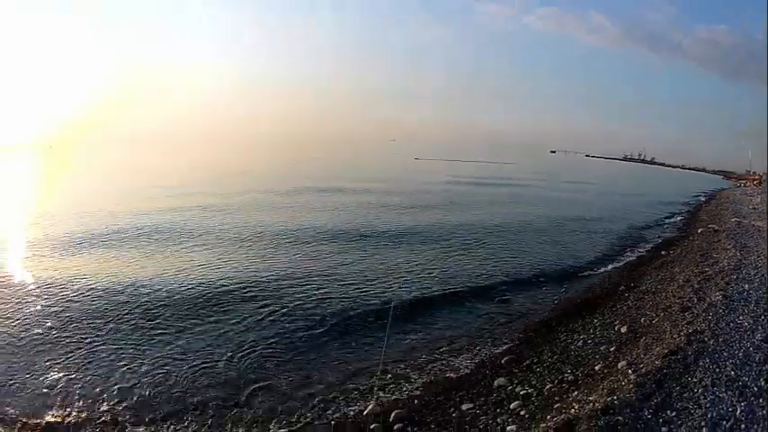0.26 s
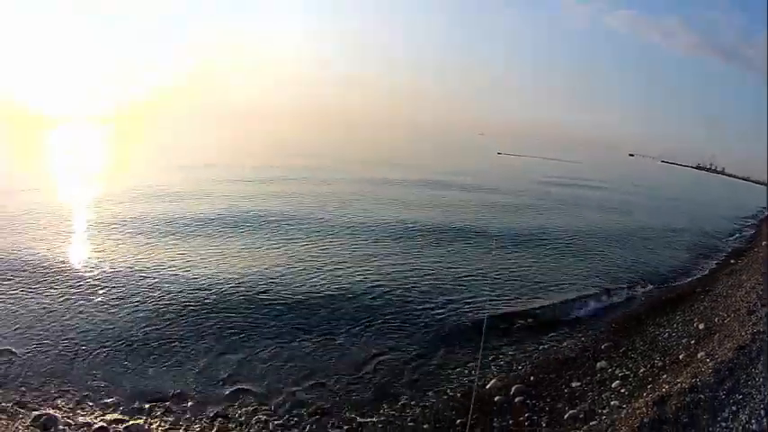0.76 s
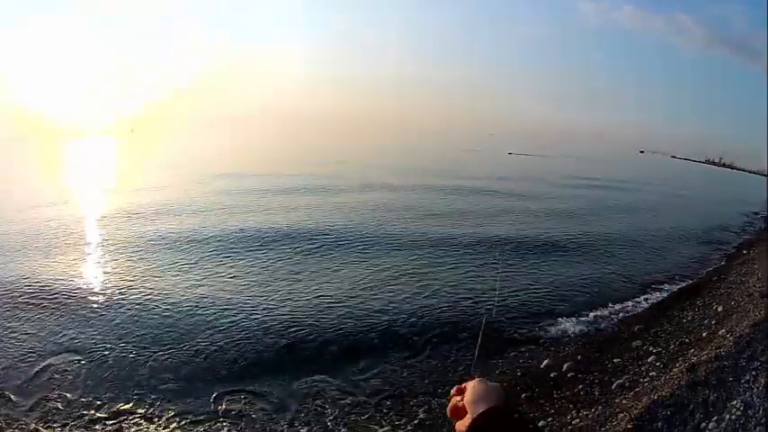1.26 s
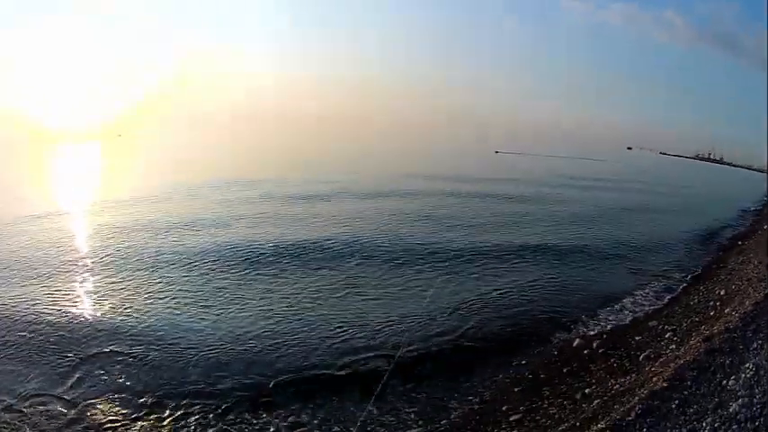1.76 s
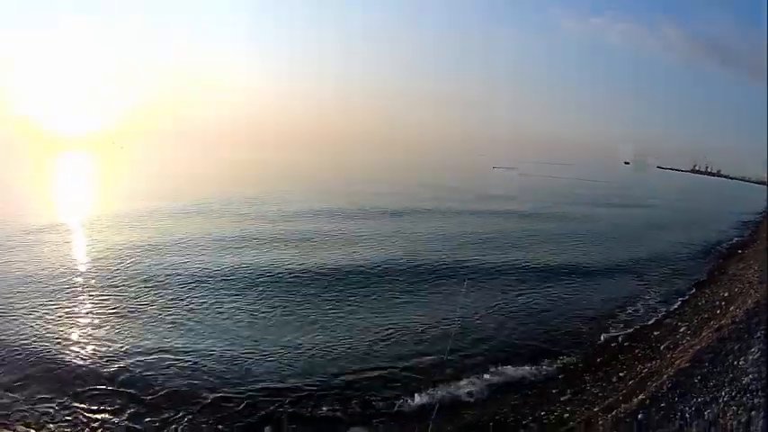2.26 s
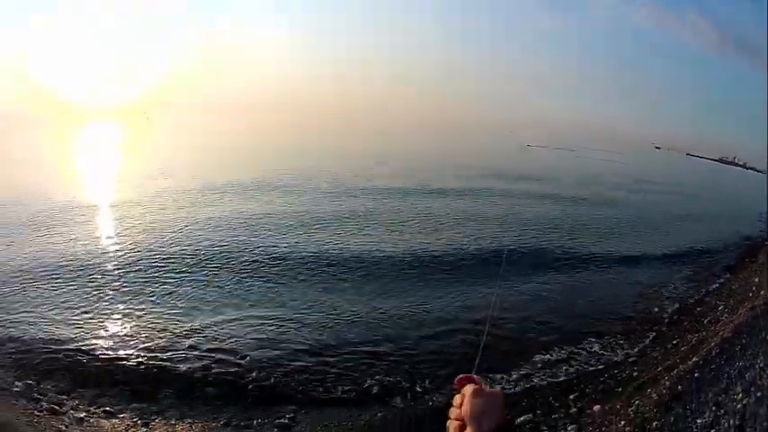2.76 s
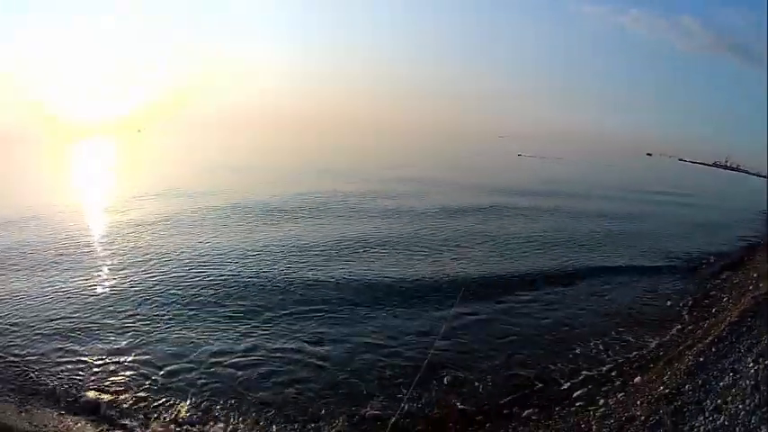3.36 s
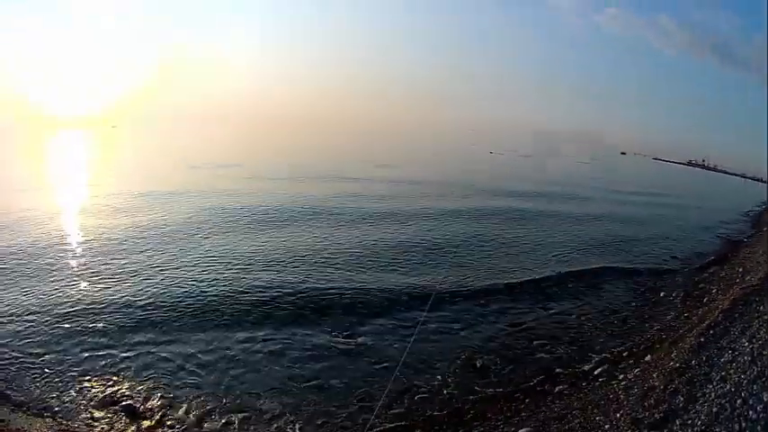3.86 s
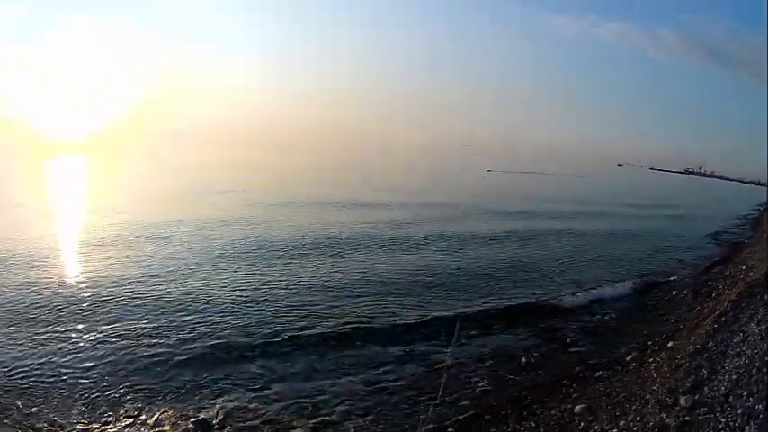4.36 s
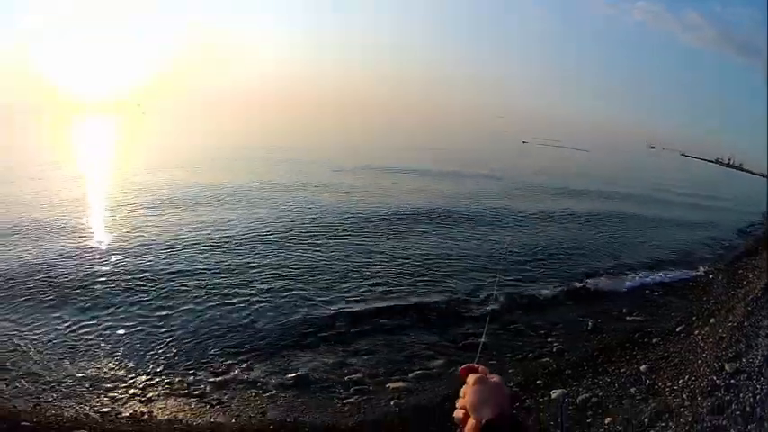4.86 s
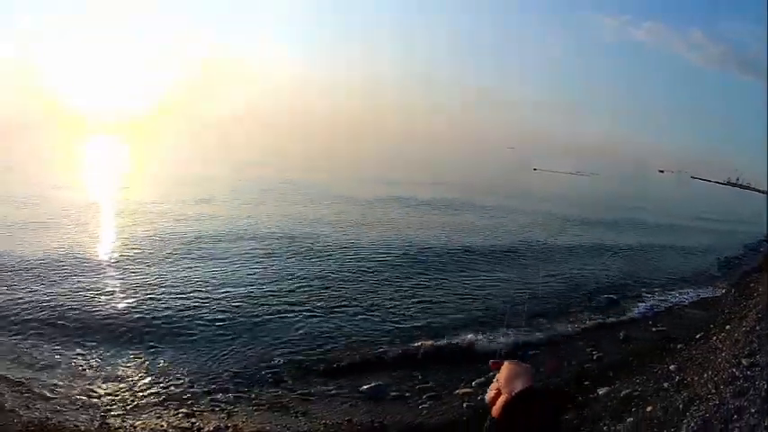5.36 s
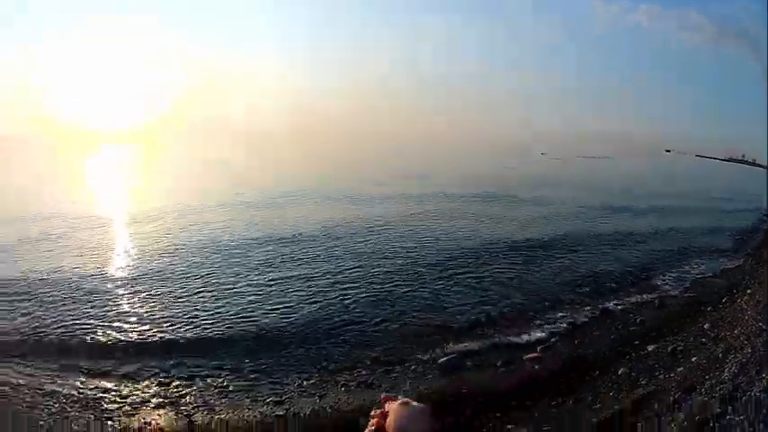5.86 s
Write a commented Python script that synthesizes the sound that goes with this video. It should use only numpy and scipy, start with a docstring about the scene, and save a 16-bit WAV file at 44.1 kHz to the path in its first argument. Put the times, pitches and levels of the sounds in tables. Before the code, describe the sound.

At the edge of a pebble beach, a small wave breaks right away with a low gurgle, runs up in a bubbly wash and fizzes out between rolling stones. More small waves follow closely, with single plops, sharp pebble clicks and faint ticks of spray nearby. Light wind rumbles on the microphone and lifts in brief gusts. The sound is slightly muffled, over a faint hiss.

```python
"""A pebble beach, from the water's edge, on one microphone in a closed housing.
A small wave breaks at once: it traps big gurgling bubbles, runs up as a wash of small ones and fizzes
out between rolling stones. More follow for six seconds, with single plops and stone clicks close by.
From about a second in, spray ticks on the stones; then gusts lift the light wind rumbling on the housing.
A faint microphone hiss lies under it all."""
import sys
import numpy as np
from scipy import signal
from scipy.fft import rfft, irfft
from scipy.io import wavfile
from scipy.ndimage import uniform_filter1d

SR = 44100
rng = np.random.default_rng(int(sys.argv[2]) if len(sys.argv) > 2 else 0)


def materialize(psi):
    """Save the field psi as 16-bit PCM at rate SR to the path in sys.argv[1].

    A 1-D psi becomes a single channel; in a 2-D psi each row is a channel.
    """
    bounded = np.clip(np.atleast_2d(psi).T, -1, 1)
    quanta = np.round(bounded * 32767).astype(np.int16)
    wavfile.write(sys.argv[1], SR, quanta)


N = 269010
TIME = np.arange(N) / SR
# what the housing lets through of the surf: (frequency [Hz], gain [dB])
HOUSING = [(150, -5.5), (400, -2.5), (900, -2), (1500, -3.5), (1950, -15), (2450, -19), (3000, -17),
           (3700, -17.5), (4700, -22.5), (6100, -26), (7000, -33), (7900, -63), (8700, -35.5), (11000, -56)]


def from_db(db):
    """Decibels to gain."""
    return 10 ** (np.asarray(db) / 20)


def rms_one(x):
    """Scale to unit power."""
    return x / np.sqrt(np.mean(x ** 2) + 1e-20)


def drift(corner_hz):
    """Slow random wander of unit power."""
    hz = np.fft.rfftfreq(N, 1 / SR)
    return rms_one(irfft(rfft(rng.standard_normal(N)) / (1 + (hz / corner_hz) ** 2), N))


def colour(x, spectrum):
    """Minimum-phase filter that follows a table of (frequency [Hz], gain [dB])."""
    size = 16384
    hz, db = np.transpose(spectrum)
    log_hz = np.log(np.fft.rfftfreq(size, 1 / SR) + 1)
    gain = from_db(np.interp(log_hz, np.log(hz), db))
    cepstrum = irfft(np.log(gain))
    cepstrum[1:size // 2] *= 2
    cepstrum[size // 2 + 1:] = 0
    impulse = irfft(np.exp(rfft(cepstrum)))[:size // 2]
    return signal.fftconvolve(x, impulse)[:len(x)]


def ping(hz, cycles, rise):
    """A sine that dies by 60 dB in so many cycles while its pitch climbs by the share `rise`."""
    life_s = max(cycles, 1) / hz
    age = np.arange(int(life_s * SR) + 2) / SR / life_s
    phase = 2 * np.pi * hz * life_s * (age + rise * age ** 2 / 2)
    return np.sin(phase) * np.exp(-np.log(1000) * age)


def add(out, s, sound):
    """Mix a sound in at s seconds."""
    start = int(np.clip(s * SR, 0, N - 1))
    out[start:start + len(sound)] += sound[:N - start]


def swarm(low_hz, high_hz, per_s, cycles, rise, spread_db, clump_db, pitches):
    """Random pings of many pitches and sizes, born in clumps; unit power overall."""
    out = np.zeros(N)
    chance = per_s * from_db(clump_db * drift(14)) / (pitches * SR)
    for hz in np.geomspace(low_hz, high_hz, pitches):
        born = np.flatnonzero(rng.random(N) < chance)
        size_db = spread_db * np.minimum(rng.exponential(1, len(born)), 3.5)
        kicks = np.zeros(N)
        kicks[born] = from_db(size_db) * rng.choice([-1, 1], len(born))
        out += hz * signal.oaconvolve(kicks, ping(hz, cycles, rise))[:N]
    return rms_one(out)


def at_level(x, level_db):
    """Even out the slow swings of a texture and give it a level."""
    power = uniform_filter1d(x ** 2, size=3000)
    return from_db(level_db) * x / np.sqrt(np.maximum(power, 0) + 1e-12)


def stir(level_db):
    """How hard the water works: a level as a gain against its own mean."""
    return from_db(level_db - np.mean(level_db))


def surges(rows, calm_db, fall_db_per_s):
    """Level in dB of surges (time [s], rise [s], hold [s], level [dB]) over a calm background."""
    power = from_db(calm_db) ** 2
    for s, rise_s, hold_s, db in rows:
        age = TIME - s
        build = np.clip(age / max(rise_s, 1 / SR), 0, 1)
        fall_db = fall_db_per_s * np.maximum(age - rise_s - hold_s, 0)
        power = power + (build * from_db(db - fall_db)) ** 2
    return 10 * np.log10(power)


def surf_levels():
    """Each wave drives wash, big bubbles, gravel and foam together; each dies away at its own rate."""
    # wavelets reaching the beach, levels ahead of each layer's own trim:
    # (time [s], rise [s], run-up [s], wash [dB], big bubbles [dB], gravel [dB], foam [dB])
    waves = [(0.0, .005, .13, -36.5, -37, -66, -67), (0.18, .04, .09, -43, -47.5, -63, -69),
             (0.41, .08, .03, -40.5, -42, -56, -65.5), (0.54, .07, .14, -39.5, -41, -68, -67),
             (0.69, .12, .2, -38, -38, -58.5, -65.5), (1.05, .1, .27, -43, -40, -63, -70),
             (1.47, .08, .1, -47.5, -60, -65.5, -73), (1.955, .05, .11, -37.5, -44, -58.5, -67),
             (2.14, .11, .07, -40, -36, -58, -69.5), (2.39, .08, .03, -47, -64, -63, -72),
             (2.55, .04, .07, -42, -44.5, -61, -68), (2.76, .1, .2, -47.5, -44.7, -80, -85),
             (3.03, .08, .06, -40.5, -41.5, -61.5, -66.5), (3.2, .1, .19, -42, -48.5, -60.5, -75),
             (3.55, .035, .075, -42.5, -51, -58.5, -64), (3.93, .07, .06, -44, -43.5, -78, -77),
             (4.085, .04, .12, -39.5, -41, -62, -65.5), (4.27, .1, .35, -38.5, -41.5, -62, -67),
             (4.9, .07, .15, -42, -43.5, -66, -73), (5.15, .045, .12, -39.5, -43.5, -59.5, -65),
             (5.48, .04, .11, -42.5, -50, -68, -75), (5.68, .11, .035, -38, -40, -59.5, -67)]
    s, rise_s, run_s, washes, plunges, gravels, foams = np.transpose(waves)
    wash_db = surges(zip(s, rise_s, run_s, washes), calm_db=-46.5, fall_db_per_s=60)
    plunge_db = surges(zip(s, rise_s, run_s, plunges), calm_db=-49, fall_db_per_s=72)
    gravel_db = surges(zip(s, rise_s, run_s, gravels), calm_db=-72, fall_db_per_s=90)
    foam_db = surges(zip(s, rise_s, run_s, foams), calm_db=-80, fall_db_per_s=99.5)
    return wash_db, plunge_db, gravel_db, foam_db


def plunge(level_db):
    """The falling crest traps big bubbles, which rise in pitch as they near the surface."""
    gurgle = swarm(155.8, 704, per_s=900, cycles=17, rise=0.075, spread_db=3, clump_db=1.5, pitches=26)
    return at_level(colour(gurgle, HOUSING), level_db - 0.2)


def wash(level_db):
    """Broken water runs up the beach full of small bubbles; more water, more bubbles."""
    per_s = 5000 * stir(level_db)
    bubbles = swarm(765, 2536, per_s, cycles=17.8, rise=0.037, spread_db=2.5, clump_db=1.44, pitches=30)
    return at_level(colour(bubbles, HOUSING), level_db - 0.2)


def foam(level_db):
    """Tiny bubbles burst in a fizz; now and then a droplet ticks on a stone."""
    froth = stir(level_db)
    fizz = swarm(5200, 9300, 5000 * froth, cycles=59, rise=0.059, spread_db=4.5, clump_db=3.5, pitches=32)
    ticks = swarm(5500, 11500, 40 * froth, cycles=7, rise=0, spread_db=3.5, clump_db=5, pitches=8)
    ticks = from_db(-72) * froth ** 0.96 * rms_one(colour(ticks, HOUSING))
    return at_level(colour(fizz, HOUSING), level_db - 0.5) + ticks


def gravel(level_db):
    """Small stones roll over one another in short flurries of clicks."""
    # the ring of the small stones: (frequency [Hz], gain [dB])
    stone_ring = [(2400, 2), (3100, -7), (3550, 2), (4000, 3.5), (4300, -3), (4600, -4.5)]
    per_s = 2600 * stir(level_db)
    clicks = swarm(2245, 5260, per_s, cycles=15, rise=0, spread_db=0, clump_db=3, pitches=16)
    rattle = colour(clicks, stone_ring)
    return at_level(colour(rattle, HOUSING), level_db + 8)


def wind():
    """Turbulence rumbles on the housing and swells in gusts; each larger eddy lands a soft thump."""
    # wind on the housing: (frequency [Hz], relative level [dB])
    rumble_spectrum = [(12, -4), (24, -6.5), (33, -1.5), (45, -0.5), (58, -3.5), (80, -4.5), (115, -10.5),
                       (160, -15.5), (300, -25), (2000, -100)]
    # gusts: (time [s], hold [s], level before trim [dB])
    gusts = [(1.43, 0.041, -43), (1.92, 0.32, -44.5), (3.77, 0.11, -42.5), (4.358, 0.04, -43),
             (5.736, 0.24, -43)]
    # eddies hitting the housing: (time [s], level [dB], pitch [Hz])
    eddies = [(1.497, -29.5, 109), (3.095, -29, 126), (4.386, -27, 113), (5.894, -31, 55.4)]
    rise_s, trim_db = 0.024, 1.2
    swells = [(s, rise_s, hold_s, db) for s, hold_s, db in gusts]
    level_db = surges(swells, calm_db=-46.5, fall_db_per_s=150) + trim_db
    out = from_db(level_db) * rms_one(colour(rng.standard_normal(N), rumble_spectrum))
    for s, db, hz in eddies:
        add(out, s, from_db(db) * ping(hz, cycles=10, rise=0))
    return out


def microphone_hiss():
    """The microphone's own faint, steady noise."""
    # noise floor: (frequency [Hz], relative level [dB])
    hiss_spectrum = [(1000, 4.5), (6000, 6), (8000, -5.5), (10000, -6), (12000, -7), (14000, -4),
                     (16000, -10.5)]
    return from_db(-71.5) * rms_one(colour(rng.standard_normal(N), hiss_spectrum))


def stray_plops(wash_db):
    """Smaller single bubbles ring at random, rising and falling in level with the wash."""
    bubbles = swarm(296, 1414, per_s=35, cycles=24, rise=0.06, spread_db=2.5, clump_db=1, pitches=12)
    return from_db(wash_db - 11.5) * bubbles


def far_knocks(gravel_db):
    """Faint knocks from pebbles farther along the beach, more and harder when the water stirs them."""
    rolling = stir(gravel_db)
    rings = swarm(3300, 7460, 35 * rolling, cycles=16, rise=0, spread_db=1.5, clump_db=1.5, pitches=9)
    clicks = colour(np.diff(rings, prepend=0), HOUSING)
    return from_db(-70) * rms_one(rolling ** 0.34 * clicks)


def near_knocks():
    """Stone on stone by the microphone: a sharp crack, a ring of milliseconds and two weaker bounces."""
    # the nearest pebbles colliding: (time [s], peak level [dB], pitch [Hz], decay [cycles])
    collisions = [(0.04, -36.5, 5100, 6.9), (0.9205, -28, 5140, 4.5), (1.001, -36.5, 3680, 8.6),
                  (1.258, -40, 5900, 8.4), (1.333, -38, 3800, 10), (1.429, -45, 6000, 8.7),
                  (1.922, -44, 3700, 9), (2.244, -49, 6500, 12), (2.6078, -31, 3400, 12),
                  (2.6128, -31.5, 3700, 29), (3.1398, -35, 4080, 7), (4.093, -37, 3930, 12),
                  (4.697, -34, 3870, 7.2), (5.306, -36, 3580, 15), (5.537, -32, 4140, 7),
                  (5.964, -44, 3950, 14)]
    bounce_loss_db = 3.5
    gaps_s = 0.0017 * rng.uniform(0.21, 3.0, (len(collisions), 2))
    out = np.zeros(N)
    for (s, peak_db, hz, cycles), gaps in zip(collisions, gaps_s):
        ring = np.zeros(SR // 50)
        add(ring, 0, ping(hz, cycles, rise=0))
        add(ring, 0, 0.35 * ping(hz * 1.5, cycles, rise=0))
        # a small body radiates its acceleration, so the lows are weak
        click = colour(np.diff(ring, prepend=0), HOUSING)
        click /= np.max(np.abs(click))
        for bounce, delay_s in enumerate([0, *np.cumsum(gaps)]):
            add(out, s + delay_s, from_db(peak_db - bounce * bounce_loss_db) * click)
    return out


def near_plops():
    """Large bubbles pinch off close to the microphone, each with one short rising note."""
    # single large bubbles: (time [s], relative level [dB], pitch [Hz], decay [cycles])
    bubbles = [(0.069, -28.5, 561, 59), (0.123, -17, 1930, 25), (0.4995, -31.5, 690, 18),
               (0.501, -25, 1250, 26), (0.547, -28.5, 1130, 34), (0.977, -24, 705, 14),
               (1.028, -17.5, 676, 14), (1.03, -26.5, 500, 16), (1.106, -28, 282, 20),
               (1.357, -29, 875, 27), (1.976, -28, 1018, 55), (1.978, -25.5, 324, 13),
               (1.988, -26, 1060, 18), (1.994, -27, 236, 7.9), (2.270, -24.5, 466, 16),
               (2.342, -30, 534, 54), (2.589, -25, 585, 7.7), (2.668, -27, 1030, 23),
               (3.139, -22, 935, 8.7), (3.17, -20.5, 1340, 15), (3.173, -27, 780, 29),
               (3.303, -29.5, 285, 10), (3.513, -19, 1370, 8.7), (3.514, -24.5, 770, 20),
               (3.918, -28, 2400, 34), (5.497, -27.5, 740, 13), (5.8, -29, 1160, 15)]
    out = np.zeros(N)
    for s, db, hz, cycles in bubbles:
        add(out, s, from_db(db + 4.5) * ping(hz, cycles, rise=0.057))
    return colour(out, HOUSING)


def spray():
    """Each drop of spray hits a stone with a tiny bright tick."""
    # drops landing close by: (time [s], level [dB])
    drops = [(1.109, -54), (1.128, -56), (1.306, -53), (2.322, -56), (3.225, -55), (4.577, -60.5),
             (4.699, -54.5), (5.385, -55)]
    pitches_hz = 9300 * rng.uniform(0.77, 1.03, len(drops))
    out = np.zeros(N)
    for (s, db), hz in zip(drops, pitches_hz):
        add(out, s, from_db(db) * ping(hz, cycles=34, rise=0))
    return out


def scene():
    """Surf, stones, wind and hiss at one microphone on the waterline."""
    wash_db, plunge_db, gravel_db, foam_db = surf_levels()
    surf = plunge(plunge_db) + wash(wash_db) + foam(foam_db)
    splashes = stray_plops(wash_db) + near_plops() + spray()
    stones = gravel(gravel_db) + near_knocks() + far_knocks(gravel_db)
    return (surf + splashes + stones + wind() + microphone_hiss())[None]


def record(dry):
    """A steep low-pass takes off the highest treble."""
    cutoff_hz = 15150
    lowpass = signal.ellip(12, 0.1, 80, cutoff_hz, fs=SR, output="sos")
    return signal.sosfilt(lowpass, dry)


dry = scene()
out = record(dry)
materialize(out)
```